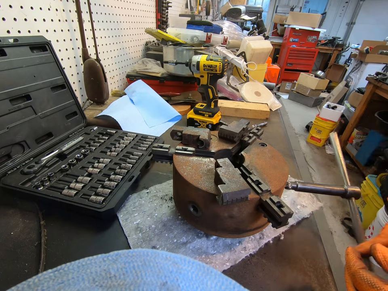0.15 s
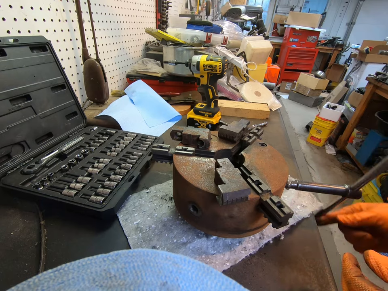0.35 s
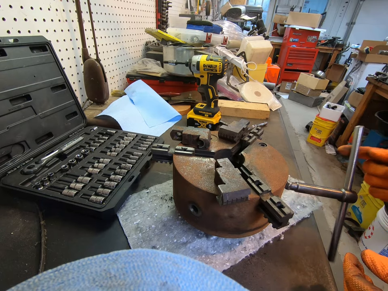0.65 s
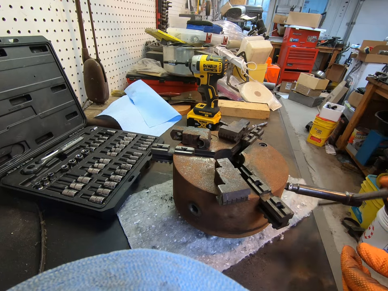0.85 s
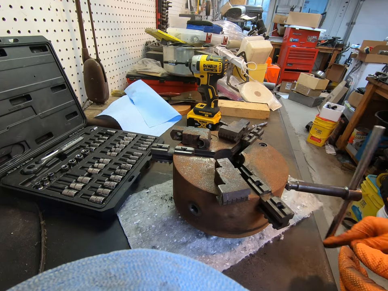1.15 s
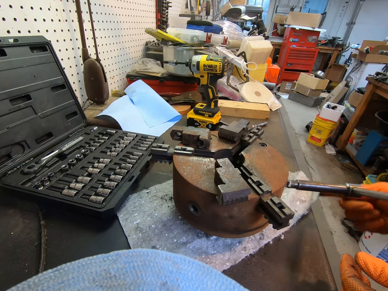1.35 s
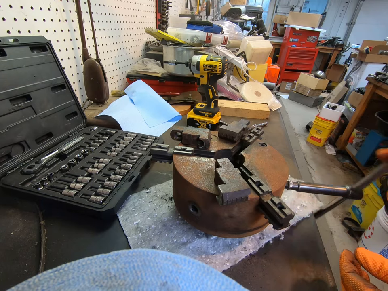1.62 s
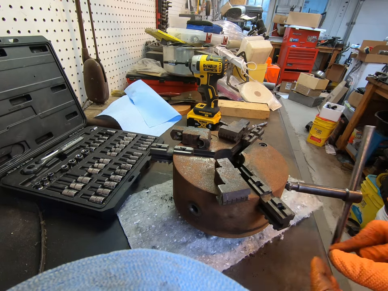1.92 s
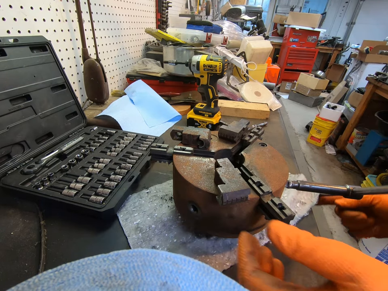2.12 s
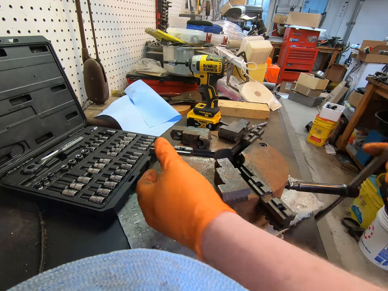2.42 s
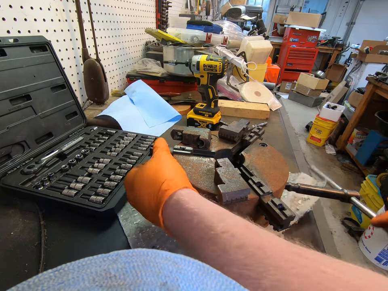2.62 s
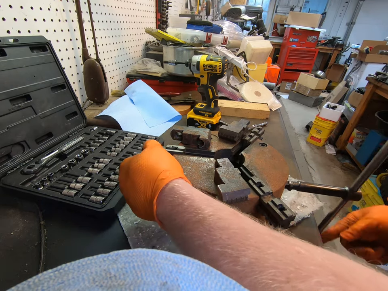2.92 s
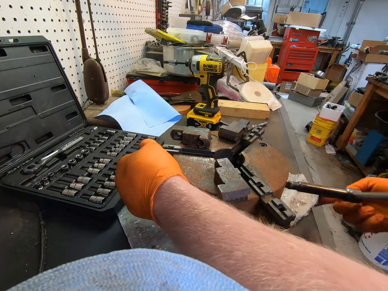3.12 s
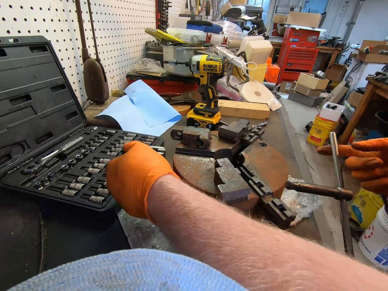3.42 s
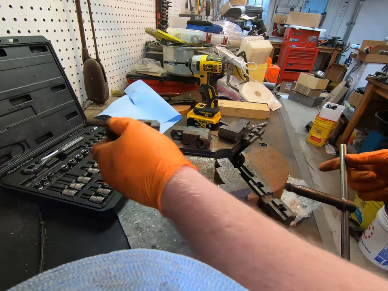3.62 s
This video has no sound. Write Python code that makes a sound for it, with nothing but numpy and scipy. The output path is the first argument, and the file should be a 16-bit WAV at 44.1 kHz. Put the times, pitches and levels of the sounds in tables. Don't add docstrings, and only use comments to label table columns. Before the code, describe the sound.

A steel key turns a rusty lathe chuck on a workshop bench, giving uneven clicks, brief gritty scrapes and low bench thumps, with the hardest clanks past the middle; close stereo microphone, short room tail.

```python
import sys
import numpy as np
from scipy import signal
from scipy.fft import rfft, irfft
from scipy.io import wavfile
from scipy.ndimage import uniform_filter1d

SR = 44100
rng = np.random.default_rng(int(sys.argv[2]) if len(sys.argv) > 2 else 0)


def amplitude_ratio(level_db):
    exponent = np.asarray(level_db, float) / 20
    return 10 ** exponent


def digitize_waveform(pressure):
    field = np.atleast_2d(pressure).T
    bounded = np.clip(field, -1, 1)
    quanta = np.round(bounded * 32767).astype(np.int16)
    wavfile.write(sys.argv[1], SR, quanta)


N = 165375

# start_s, length_s, level_db, key_rel_db
SCRAPES = [(0, 0.0068, -40.5, -11), (0.132, 0.051, -35, -4.5), (0.364, 0.018, -46, -7.5),
           (0.599, 0.012, -54.5, 4), (0.723, 0.022, -46.5, -9), (0.936, 0.032, -41, -5),
           (1.604, 0.015, -46, -33), (2.926, 0.21, -69.5, 2), (1.818, 0.029, -45, 4),
           (1.884, 0.017, -40.5, -9), (2.364, 0.072, -54, -25.5), (2.644, 0.024, -36.5, -2.5),
           (3.266, 0.025, -54.5, -3.5), (3.364, 0.032, -57, -15.5), (3.679, .07, -59, -0.5)]
# time_s, grinding_db, base_groan_db, bench_shake_db
EFFORT = [(0, -63.5, -44, -40.5), (.09, -68.5, -60, -56), (.3, -59.5, -42, -38.5),
          (.55, -75.5, -65.5, -57.5), (.75, -59, -46, -47), (.89, -75.5, -75, -56.5),
          (1.2, -66.5, -50.5, -43), (1.42, -76, -64, -57.5), (1.62, -62.5, -50, -49.5),
          (2.05, -59, -49, -44.5), (2.2, -76, -73.5, -61.5), (2.45, -53.5, -93, -43),
          (2.6, -71.5, -54.5, -51.5), (2.78, -60, -47.5, -43.5), (2.96, -63.5, -54.5, -42),
          (3.12, -98, -85.5, -67), (3.35, -58, -58, -47), (3.62, -92.5, -74, -56.5)]
# start_s, level_db, jaws_rel_db, key_rel_db, base_rel_db
TICKS = [(0.118,-33.5,-10.5,-18,1.5), (0.139,-25,-23,-29,1), (0.145,-30.5,4,-16,-23),
         (0.155,-24.5,-3,-11.5,-31), (0.368,-40.5,-19,-6,-10), (0.597,-36,-7,-14,-23),
         (0.606,-33.5,-9.5,-17.5,-16), (0.645,-33.5,-11,-12,-13), (0.666,-40.5,-3,-14,-12),
         (0.729,-24,-17,-13,-7.5), (0.747,-32,-7,-7.5,-10), (0.816,-29,-14.5,-29,-12),
         (0.914,-39.5,-3,-16,-3.5), (0.947,-31,4.5,-16.5,-12), (0.955,-19,-10.5,-51,-21.5),
         (1.171,-33.5,-8,-21,-9), (1.256,-37,-22,-20,5), (1.494,-34,0.5,-5,-9),
         (1.568,-34,-5,-23.5,0),
         (1.631,-14,-24.5,-50,-27.5), (1.681,-30,-21,-26,3), (1.812,-23,-10,-12,-5),
              (1.826,-13.5,-12,-23,-9.5), (1.887,-28.5,-0.5,-30,-34), (1.975,-29.5,-16.5,-20.5,-17),
              (2.333,-39,-8.5,-7,-22), (2.358,-39.5,-5,-11,-7), (2.371,-24.5,-3,-13,-14),
              (2.378,-19,-36,-33.5,-12.5), (2.409,-29.5,1,-18.5,-2), (2.433,-12.5,-15,-43.5,-11),
              (2.459,-20.5,-14.5,-34,-16.5), (2.4875,-15.5,-7,-38.5,-12), (2.622,-36.5,-4,-8,-22),
              (2.637,-30,-5,-1.5,-28), (2.657,-22,-6.5,-3.5,-21), (2.861,-37,-12.5,-14,-2),
              (3.274,-37.5,-3.5,-6.5,-16), (3.375,-19.5,-17,-26,-15.5), (3.398,-27,-12,-22.5,-12),
              (3.673,-35,-7,-2,-28)]
# start_s, level_db, jaws_rel_db
CATCHES = [(0.005, -24, -35), (0.047, -51, -4), (0.104, -46.5, -14), (0.222, -32.5, -9.5),
           (0.268, -41, -12), (0.298, -32, -18), (0.348, -36.5, -30), (0.569, -42, -27),
           (0.679, -32.5, -18), (0.699, -38, -8.5), (0.774, -38.5, -14), (0.807, -33, -26),
           (0.992, -33, -26), (1.032, -35.5, -20.5), (1.092, -37, -25), (1.129, -42.5, -12),
           (1.147, -34.5, -17), (1.202, -34, -16.5), (1.267, -40, -9), (1.323, -47, -18), (1.371, -41, -27),
           (1.449, -47, -24), (1.548, -41, -4), (1.644, -35, -22), (1.66, -32, -13), (1.686, -36, -8.5),
           (1.755, -52, 0), (1.778, -40, -12), (1.935, -58, 1), (1.955, -36, -29), (2.026, -38, -14),
           (2.061, -33.5, -21), (2.112, -42, -17), (2.252, -50, -25), (2.293, -53, 6.5),
           (2.311, -46.5, -19), (2.58, -60, 11), (2.609, -46.5, -3), (2.797, -56, -10), (2.83, -47, -13),
           (2.946, -34, -11.5), (2.975, -45.5, -4.5), (3.155, -50, -25.5), (3.231, -48, -27),
           (3.291, -43, 0), (3.322, -42, -3.5), (3.51, -43.5, -36), (3.537, -45, -19)]
# start_s, level_db, contact_s
KNOCKS = [(0.12, -42, .001), (0.68, -49, 0.00089), (0.742, -54, 0.00073), (0.809, -44.5, 0.0008),
          (1.259, -54.5, 0.00047), (1.569, -45, 0.00068), (1.683, -43, 0.00085), (1.772, -48, 0.00059),
          (2.428, -48, 0.00028), (2.481, -49, .0006), (3.329, -42, 0.00089)]
# mode_hz, level_db, t60_s
BASE_MODES = [(224.4, 9, 0.037), (377, -15, 0.0083), (446.7, -3.5, 0.12)]
BODY_MODES = [(850, -15.5, 0.0061), (1022, -9.5, 0.023), (1228, -3, 0.032), (1271, 8.5, 0.0087),
              (1374, -10.5, 0.019)]
JAWS_MODES = [(2107, -5.5, 0.012), (2255, -13, 0.093), (2544, -11.5, 0.03), (2730, 4.5, 0.012),
              (2947, -14.5, 0.041), (3225, -13, 0.011)]
KEY_MODES = [(3910, 1.5, 0.02), (4350, 3, .008), (5020, -10.5, 0.01), (7400, -26, 0.1)]
# low_hz, high_hz, level_over_modes_db, t60_s, stereo_width_db
DENSE_RINGING = [
    (119, 576, 1.5, 0.066, -12),
    (660, 1730, -2, 0.043, -4),
    (1850, 3240, -1.5, 0.042, -0.5),
    (3200, 7300, -1, 0.045, 4.5),
]
# mode_hz, level_db, t60_s, rise_s
BENCH_MODES = [(36.94, 1.5, 0.81, 0.0097), (79, 5, 0.17, 0.0081), (98.7, -3.5, 0.2, 0.0044),
               (141.4, -2.5, 0.15, 0.021)]
# rel_db, lead_rad
BENCH_LEFT = [(-5.8, -2.5), (-7, 2.6), (-6.6, 3.05), (-5, -2.3)]
# time_s, level_db, rocking_rel_db
THUMPS = [(0.152, -19.5, -9), (0.362, -35.5, 1.5), (0.731, -31.5, -3), (0.958, -21.5, -11.5),
          (1.188, -29, -1), (1.594, -36.5, -36), (1.828, -21.5, -9.5), (1.989, -38.5, 0.5),
          (2.385, -45.5, -12.5), (2.497, -35, -12.5), (2.652, -19, -10), (2.883, -28.5, -2.5),
          (3.398, -29, -0.5)]
# freq_hz, density_db_per_hz
FLOOR_SPECTRUM = [(88, -28.5), (150, 8), (308, -20), (692, -18), (1110, -27), (3870, -34.5), (10000, -39),
                  (13000, -73), (22000, -120)]
# middle_s, half_length_s, level_db
GLOVE_RUBS = [
    (1.27, 0.064, -71),
    (1.733, 0.18, -78.5),
    (2.092, 0.071, -73),
    (2.339, 0.12, -72.5),
    (2.545, 0.073, -60),
    (2.69, 0.087, -67.5),
    (2.965, 0.078, -71),
    (3.3, 0.11, -67),
]
# freq_hz, density_db_per_hz
RUSTLE_SPECTRUM = [(2350, -17.5), (4000, -10.5), (5210, -12), (7530, -7.5), (10900, -14), (14200, -51.5),
                   (22000, -120)]

SCRAPE_GRAINS_PER_S, SCRAPE_BASE_DB, SCRAPE_JAWS_DB = 1800, 1.5, -2
GRIT_PER_S, GRIT_SPREAD_DB, GRIT_JAWS_DB, GRIT_KEY_DB = 900, 2.5, -7, -15.5
TICK_DB, RATTLE_DB, RATTLE_DECAY_S = -6, -17.5, 0.0025
CATCH_KEY_DB, CATCH_BASE_DB = -31.5, -8.5
CONTACT_TURNS_PER_S = 6.5
STRIKE_RISE_S, DENSE_BUILD_S, MODE_WIDTH_DB = 0.0003, 0.004, -21
THUMP_DB, PUSH_S = 14.5, 0.0022
FLOOR_DB, ROOM_DB, ROOM_T60_S = -59.5, -10.5, 0.26


def evened(x):
    return x / np.sqrt(np.mean(x ** 2) + 1e-20)


def add(mix, start_s, sound):
    part = mix[..., round(start_s * SR):][..., :sound.shape[-1]]
    part += sound[..., :part.shape[-1]]


def follow(table, column):
    rows = np.array(table)
    return amplitude_ratio(np.interp(np.arange(N) / SR, rows[:, 0], rows[:, column]))


def coloured(spectrum, noise):
    point_hz, point_db = np.transpose(spectrum)
    size = noise.shape[-1]
    hz = np.fft.rfftfreq(size, 1 / SR)
    level_db = np.interp(np.log(hz + 1), np.log(point_hz + 1), point_db, -80, -80)
    return evened(irfft(rfft(noise) * amplitude_ratio(level_db), size))


def grains(per_s, spread_db):
    u = rng.random((N, 3))
    present = u[:, 0] < per_s / SR
    size = amplitude_ratio(-spread_db * np.log(u[:, 2] + 0.012))
    return evened(present * np.sign(u[:, 1] - 0.5) * size)


def patches(channels, length):
    once = uniform_filter1d(rng.standard_normal((channels, N)), length)
    return evened(uniform_filter1d(once, length))


def scrapes():
    force = np.zeros((4, N))
    rough = grains(SCRAPE_GRAINS_PER_S, 3.23)
    for start_s, length_s, db, key_db in SCRAPES:
        u = np.arange(round(length_s * SR)) / (length_s * SR)
        start = round(start_s * SR)
        envelope = np.minimum(u / 0.29, 1) * amplitude_ratio(-14 * u ** 2)
        part_db = np.array([[SCRAPE_BASE_DB], [0], [SCRAPE_JAWS_DB], [key_db]])
        add(force, start_s, amplitude_ratio(db + part_db) * envelope * rough[start:start + len(u)])
    return force


def grit():
    force = np.zeros((4, N))
    grind = grains(GRIT_PER_S, GRIT_SPREAD_DB) * amplitude_ratio(4.6 * patches(1, 400)[0])
    force[1:] = amplitude_ratio([[0], [GRIT_JAWS_DB], [GRIT_KEY_DB]]) * grind * follow(EFFORT, column=1)
    force[0] = 0.87 * np.roll(grind, N // 2) * follow(EFFORT, column=2)
    return force


def ticks():
    force = np.zeros((4, N))
    t = np.arange(400) / SR
    catches = [(*row, CATCH_KEY_DB, CATCH_BASE_DB) for row in CATCHES]
    for start_s, db, jaws_db, key_db, base_db in TICKS + catches:
        chatter = amplitude_ratio(RATTLE_DB) * rng.standard_normal(400) * np.exp(-t / RATTLE_DECAY_S)
        blow = 4 * ((t == 0) + chatter)
        part_db = np.array([[base_db + 11.5], [0], [jaws_db + 8], [key_db + 5]])
        add(force, start_s, amplitude_ratio(db + TICK_DB + part_db) * blow)
    return force


def knocks():
    force = np.zeros((4, N))
    t = np.arange(400) / SR
    for start_s, db, contact_s in KNOCKS:
        add(force[0], start_s, amplitude_ratio(db) * np.exp(-(t / contact_s - 2) ** 2))
    return force


def ring(modes, low_hz, high_hz, dense_db, dense_t60_s, width_db):
    t = np.arange(6000) / SR
    tones = np.zeros((2, 6000))
    side = np.array([[1], [-1]])
    for hz, db, t60_s in modes:
        db = db + rng.uniform(-1.3, 1.3)
        twin_hz = hz * (1 + rng.uniform(-0.038, 0.03))
        lean_rad = rng.standard_normal(2) * amplitude_ratio(MODE_WIDTH_DB)
        main = np.sin(2 * np.pi * hz * t + side * lean_rad[0])
        twin = np.sin(2 * np.pi * twin_hz * t + side * lean_rad[1])
        tones += amplitude_ratio(db - 60 * t / t60_s) * (main + 0.5 * twin)
    tones = evened(tones * (1 - np.exp(-t / STRIKE_RISE_S)))
    noise = rng.standard_normal((3, 6000))
    dense = noise[0] + amplitude_ratio(width_db) * noise[1:]
    dense = dense * (1 - np.exp(-t / DENSE_BUILD_S)) * amplitude_ratio(-60 * t / dense_t60_s)
    band = signal.butter(2, [low_hz, high_hz], "band", fs=SR, output="sos")
    out = tones + amplitude_ratio(dense_db) * evened(signal.sosfilt(band, dense))
    lowpass = signal.butter(4, min(high_hz * 1.434, 15000), fs=SR, output="sos")
    out = signal.sosfilt(lowpass, out)
    return out / np.linalg.norm(out, axis=1, keepdims=True)


def chuck():
    force = scrapes() + grit() + ticks() + knocks()
    turn = np.cumsum(1 + patches(1, 2000)[0]) * CONTACT_TURNS_PER_S / SR
    out = np.zeros((2, N))
    parts = (BASE_MODES, BODY_MODES, JAWS_MODES, KEY_MODES)
    for drive, modes, dense in zip(force, parts, DENSE_RINGING):
        for k in range(3):
            share = np.cos(np.pi * (turn + k / 3)) ** 2
            out += signal.oaconvolve((drive * share)[None], ring(modes, *dense), axes=1)[:, :N]
    return out


def bench():
    t, out = np.arange(SR) / SR, np.zeros((2, N))
    push = np.exp(-(t[:800] / PUSH_S - 1.5) ** 2)
    push /= push.sum()
    for k, ((hz, db, t60_s, rise_s), (left_db, lead_rad)) in enumerate(zip(BENCH_MODES, BENCH_LEFT)):
        shake_db = -16.5 + 4.85 * (k == 3)
        drive = rng.standard_normal(N) * follow(EFFORT, column=3) * amplitude_ratio(shake_db)
        for time_s, level_db, rock_db in THUMPS:
            mode_db = rock_db * (k == 0)
            add(drive, time_s - 0.006, amplitude_ratio(level_db + THUMP_DB + mode_db) * push)
        envelope = (1 - np.exp(-t / rise_s)) * amplitude_ratio(db - 60 * t / t60_s)
        mode = envelope * np.sin(2 * np.pi * hz * t + np.array([[lead_rad], [0]]))
        out += signal.fftconvolve(drive[None], mode * amplitude_ratio([[left_db], [0]]), axes=1)[:, :N]
    return out


def room_floor():
    noise = rng.standard_normal((3, N))
    return amplitude_ratio(FLOOR_DB) * coloured(FLOOR_SPECTRUM, noise[0] + 0.5 * noise[1:])


def room(x):
    t = np.arange(SR // 2) / SR
    tail = rng.standard_normal((2, len(t))) * amplitude_ratio(-60 * t / ROOM_T60_S) * (t > 0.006)
    return signal.fftconvolve(x, tail / np.linalg.norm(tail[0]), axes=1)[:, :N]


def gloves():
    t = np.arange(N) / SR
    rub = rng.standard_normal((2, N)) * amplitude_ratio(1.5 * patches(2, 300))
    puffs = sum(amplitude_ratio(db) * np.exp(-((t - middle_s) / half_s) ** 2) for middle_s, half_s, db in GLOVE_RUBS)
    return coloured(RUSTLE_SPECTRUM, rub) * puffs * amplitude_ratio([[4.5], [2.5]])


def scene():
    metal = chuck() * amplitude_ratio([[-2.2], [-1.4]])
    return metal + bench() + room_floor() + amplitude_ratio(ROOM_DB) * room(metal) + gloves()


def low_pass(x):
    return signal.sosfilt(signal.butter(12, 11040, fs=SR, output="sos"), x)


def record(dry):
    soft = signal.sosfilt(signal.butter(3, 8800, fs=SR, output="sos"), dry)
    return low_pass(soft)


dry = scene()
out = record(dry)
digitize_waveform(out)
```